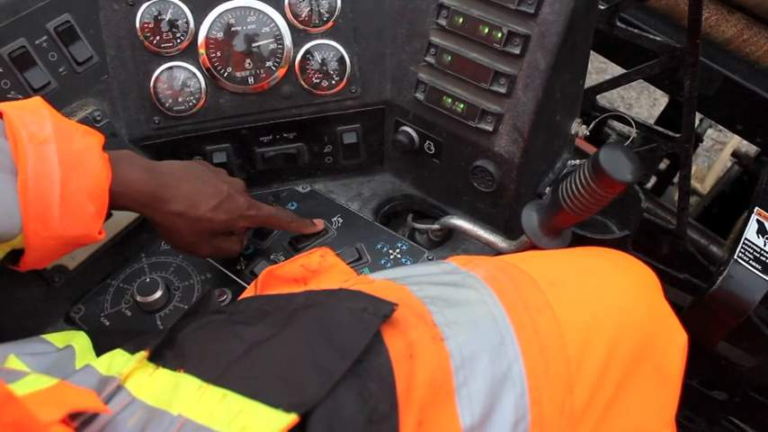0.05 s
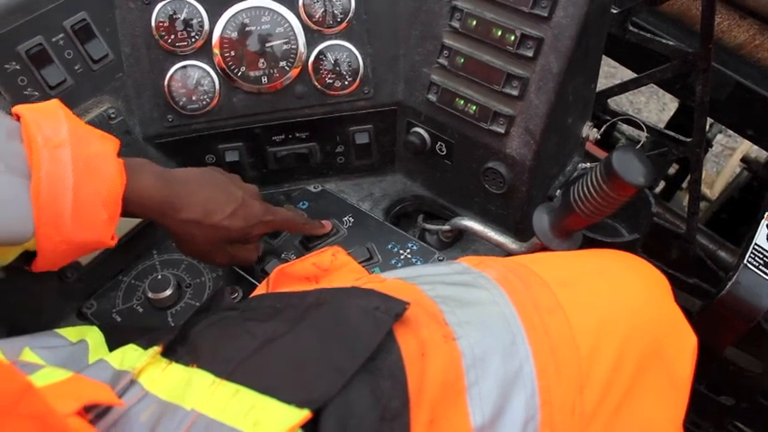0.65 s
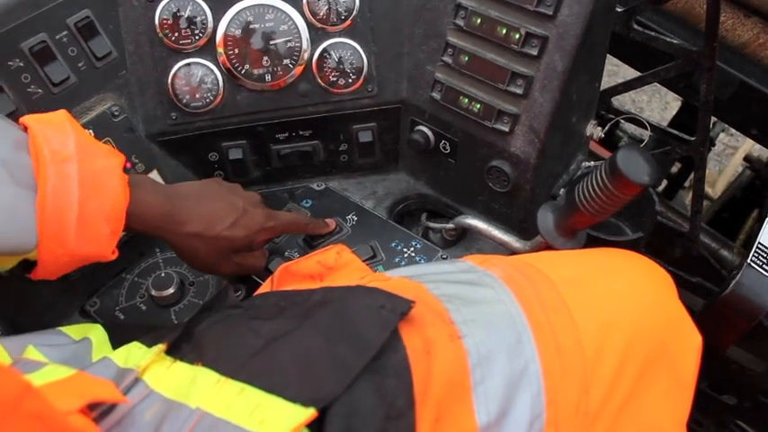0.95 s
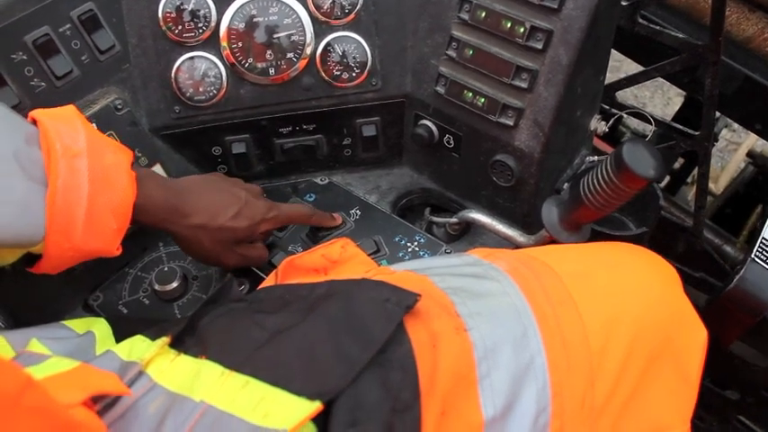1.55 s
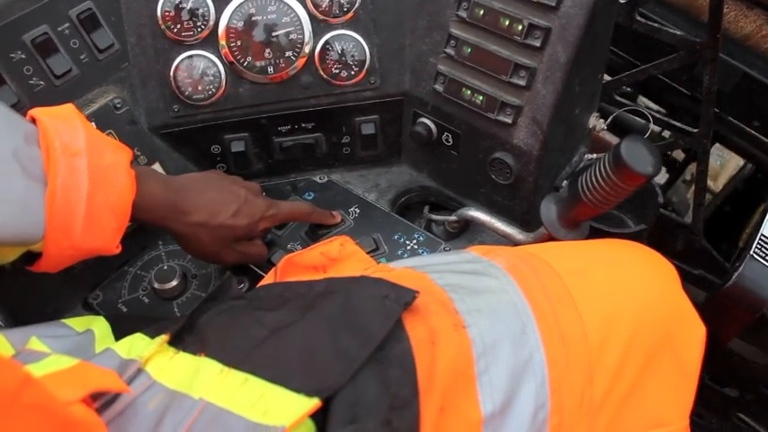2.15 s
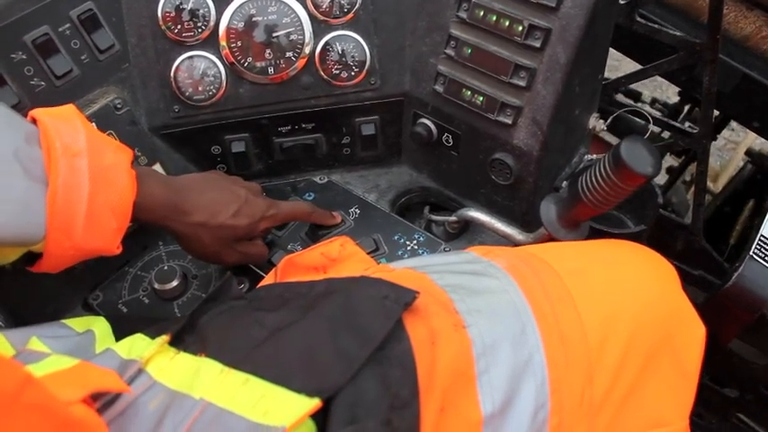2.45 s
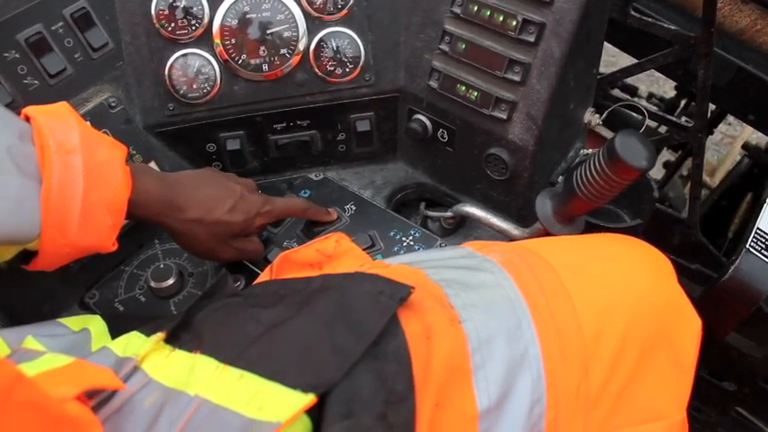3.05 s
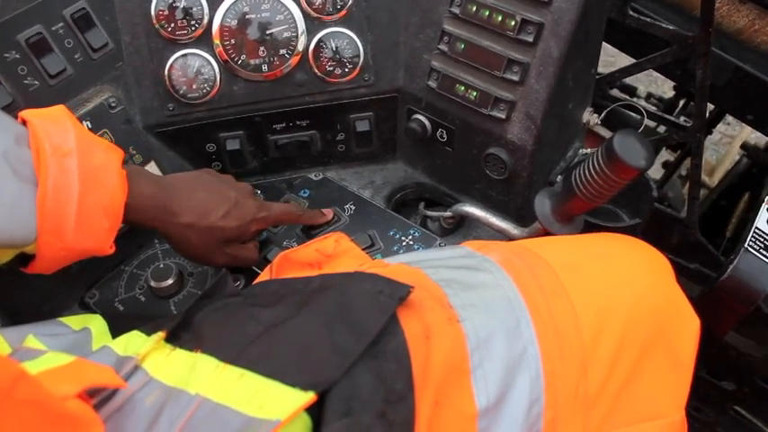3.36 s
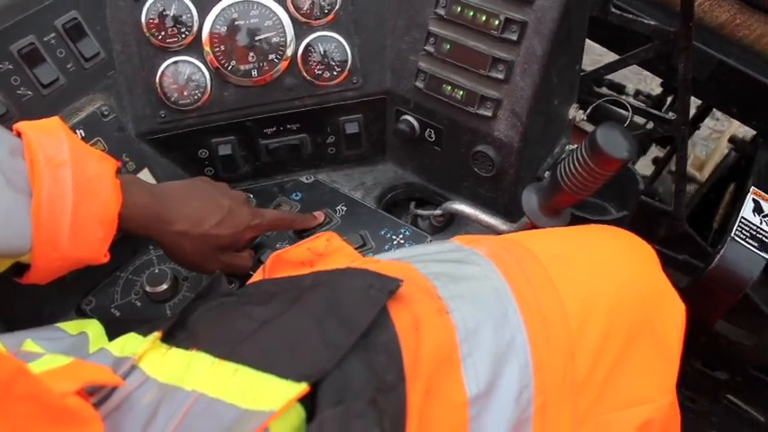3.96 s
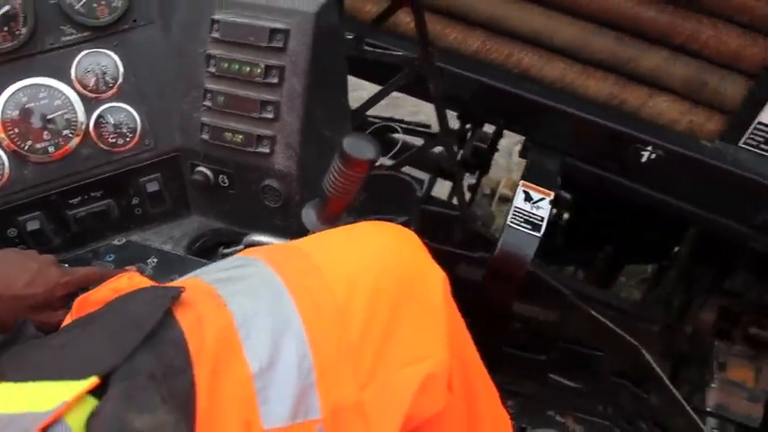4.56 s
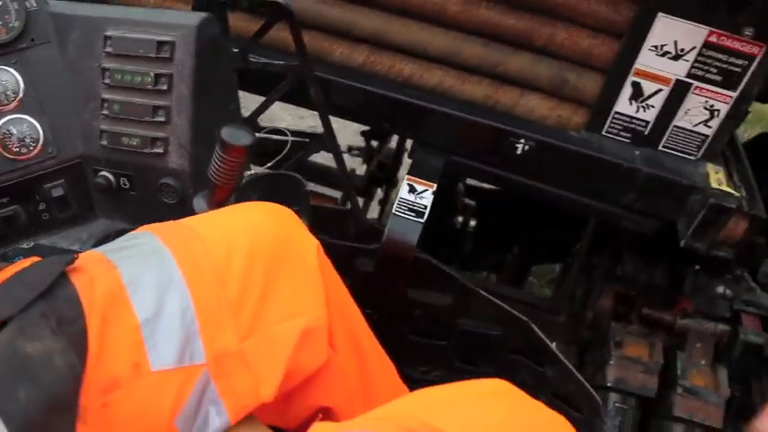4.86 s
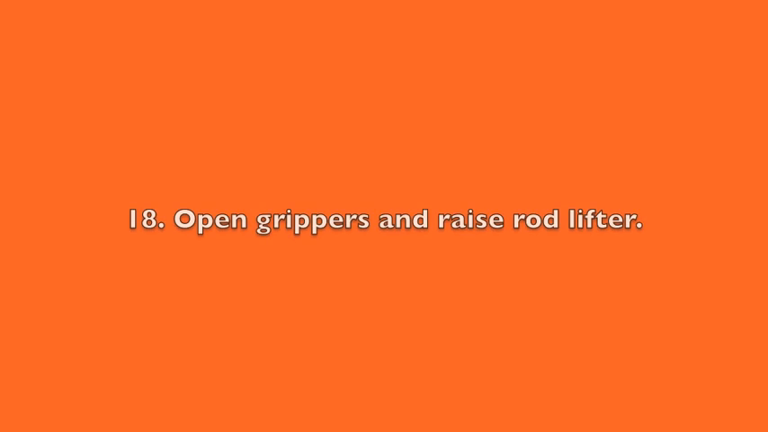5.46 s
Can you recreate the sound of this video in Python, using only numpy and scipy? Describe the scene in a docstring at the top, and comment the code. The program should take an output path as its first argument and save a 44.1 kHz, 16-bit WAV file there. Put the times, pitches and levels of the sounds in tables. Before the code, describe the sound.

A four-cylinder diesel engine runs with a deep, steady boom, heard close at a drilling rig's console. A hydraulic pump hums over a broad roar of air and oil. Steel scrapes faintly at the start. The engine sags slightly under load for about two seconds, with a small clink and a short valve spurt, then recovers. Thin whines swell and the pump hum fades as the microphone turns away, before everything fades quickly.

```python
"""At the console of a drilling rig, a governed four-cylinder diesel booms at its firing rate and drives
a hydraulic pump whose pressure ripple hums. Turbulent air and oil roar and excite covers and pipes.
A held button loads the hydraulics for about two seconds: the engine sags a little and the oil hiss
changes colour. The steel rod handler scrapes and clinks faintly, a valve spurts, and thin whines swell
and fade. The microphone swings from the console to the rod rack, and the sound fades out quickly."""
import sys
import numpy as np
from scipy import signal
from scipy.fft import rfft, irfft, next_fast_len
from scipy.io import wavfile
from scipy.ndimage import map_coordinates

SR = 44100
rng = np.random.default_rng(int(sys.argv[2]) if len(sys.argv) > 2 else 0)


def waveform_to_disk(signal):
    """Save audio, clipped to [-1, 1], as 16-bit WAV at the path in sys.argv[1]."""
    frames = np.transpose(np.atleast_2d(signal))
    scaled = np.clip(frames, -1, 1) * 32767
    samples = np.round(scaled).astype(np.int16)
    wavfile.write(sys.argv[1], SR, samples)


N = 246915
TIME = np.arange(N) / SR
PADDED = next_fast_len(N, real=True)
HZ = np.maximum(np.arange(PADDED // 2 + 1) * SR / PADDED, 1)

CYLINDERS = 4
FREE_SPEED, LOADED_SPEED = 22.96, 22.69  # four-stroke cycles per second, two crank turns each
# the microphone's swing from console to rod rack: t/s, share of the swing (0-1)
MIC_SWING = [(0, 0.09), (4.1, 0), (4.4, 0.32), (4.65, 0.87), (5.1, 1)]


def engine_hum(cycle, shares, scatter_rad=0.714, trim_db=0.06):
    """Periodic firing gives a harmonic series: the fourth order booms, the others line up into thuds."""
    # exhaust boom: level/dB running free, under load, facing the rods
    boom_levels = (-29.6, -30.2, -28.0)
    # higher harmonics: multiple of the cycle rate, level/dB running free, under load, facing the rods
    harmonics = [(6, -51, -48, -56), (7, -42, -39, -48), (8, -33, -34, -36), (9, -50, -50, -55),
                 (10, -41, -44, -47), (11, -47, -49, -52), (12, -44, -44, -39), (13, -48, -44, -48),
                 (14, -45, -49, -46), (15, -49, -47, -48), (16, -37, -42, -41), (18, -41, -47, -45),
                 (20, -34, -35, -36), (21, -48, -47, -51), (22, -46, -40, -48), (23, -43, -42, -45),
                 (24, -45, -47, -45), (28, -43, -43, -41), (32, -52, -47, -71), (37, -55, -49, -59),
                 (41, -49, -56, -55), (49, -55, -49, -54), (52, -46, -51, -49), (68, -52, -50, -55),
                 (88, -49, -54, -56), (104, -50, -51, -55)]
    boom_db = np.array(boom_levels) @ shares + 1.1 * drift(rate_hz=6)
    out = from_db(boom_db) * np.sin(2 * np.pi * CYLINDERS * cycle)
    for order, *levels in harmonics:
        level_db = trim_db + np.array(levels) @ shares + 1.5 * drift(rate_hz=3)
        # odd orders come from unequal cylinders, high ones arrive by many paths: neither line up
        phase_spread = scatter_rad * max(1, order / 20) ** 2 + order % 2
        phase = 2 * np.pi * order * cycle + phase_spread * rng.standard_normal()
        out += from_db(level_db) * np.cos(phase)
    return np.sqrt(2) * out


def pump(cycle, order=26, level_db=-29):
    """Pressure ripple, thirteen pulses a crank turn, radiates a tone; it fades as the microphone turns."""
    gain = from_db(level_db) * np.sqrt(1 - ramp(start_s=4.11, length_s=0.9))
    flutter = 1 + 0.049 * drift(rate_hz=25)
    return gain * flutter * np.sqrt(2) * np.cos(2 * np.pi * order * cycle)


def roar(cycle, shares, low_cut_hz=32, trim_db=0.13, turned_db=-1.3):
    """Source and filter: the rush is heard as a broad roar and as forced resonance of the rig's parts."""
    # spectral envelope of engine, cooling air and oil: f/Hz, level/dB
    envelope = [(25, -69), (80, -58.5), (200, -61), (500, -64), (680, -65.5), (1100, -66), (1800, -76.5),
                (3500, -69), (4700, -76), (5300, -80), (8700, -82), (11500, -82.5), (13200, -89.5),
                (15800, -88.5)]
    # covers, pipes and valves, with the cooling fan's narrow hum near 300 Hz in the first row: f/Hz, width/Hz,
    # level/dB running free, under load, facing the rods
    resonances = [(299.4, 26, -53.5, -51, -59.5), (454.6, 65, -55.5, -55.5, -61),
                  (822, 85, -66, -64, -66.5), (942, 95, -65, -62, -73.5), (1132, 102, -61.5, -59.5, -61.5),
                  (1238, 100, -65.5, -68.5, -59.5), (1400, 56, -64, -60.5, -61),
                  (1598, 130, -66.5, -66.5, -68), (1731, 66, -68.5, -63.5, -69.5),
                  (1966, 250, -70.5, -71, -69.5), (2313, 470, -72.5, -70.5, -74),
                  (2937, 120, -77.5, -73, -70.5), (3647, 150, -69.5, -66, -74.5),
                  (3787, 33, -61, -65, -78.5), (4193, 150, -70.5, -69, -80.5),
                  (4660, 140, -72, -71.5, -81.5), (4920, 80, -72, -69, -68), (5425, 250, -75.5, -76, -84.5),
                  (6194, 280, -74, -74.5, -73.5), (6970, 950, -81, -78.5, -80), (7730, 270, -79, -76, -75),
                  (8550, 449, -81, -80, -74.5), (8910, 53.6, -69.5, -69.5, -75.5),
                  (9600, 308, -91.5, -82, -94.5), (11200, 240, -79, -80, -76.5),
                  (12600, 400, -87, -87, -77.5), (13681, 744, -99.5, -89, -90),
                  (15600, 120, -86, -102, -93.5)]
    broad_power = spectrum(envelope) / (1 + (low_cut_hz / HZ) ** 2) ** 2
    out = panel_echoes(coloured(rush(cycle), broad_power))
    drive = rush(cycle)
    # oil pressure and listening direction shift the weight among the resonances
    for state, share in enumerate(shares):
        power = sum(peak(hz, width, levels[state]) for hz, width, *levels in resonances)
        out += share * coloured(drive, power)
    return from_db(trim_db + turned_db * shares[-1]) * out


def rush(cycle, throb=0.16, lope=0.08, flow_db=-0.5, clatter_low_hz=650):
    """Turbulence of air and oil and the diesel's clatter, amplitude-modulated by the firing."""
    # the lower rush swells at each firing, and once a cycle as the cylinders are unequal
    swell = throb * np.cos(2 * np.pi * CYLINDERS * cycle) + lope * np.cos(2 * np.pi * cycle)
    flow = from_db(flow_db) * rng.standard_normal(N)
    flow += coloured(flow * swell, peak(hz=0, width=5000, db=0))
    # injectors and valves strike in the same pattern in every cycle
    pattern = rng.standard_normal(round(SR / FREE_SPEED))
    strikes = np.interp(cycle % 1, np.linspace(0, 1, len(pattern)), pattern)
    clatter_power = peak(hz=1100, width=3200, db=-6.5) * (HZ > clatter_low_hz)
    clatter = coloured(strikes * (1 + swell), clatter_power)
    return (flow + clatter) * np.sqrt(SR / 2)  # near 0 dB per Hz


def panel_echoes(x, sway_ms=0.011, swing_ms=0.32, strength=0.22, count=4):
    """Interference: echoes off nearby panels comb-filter the treble and shift as the microphone moves."""
    treble = coloured(x, (1 - peak(hz=0, width=4700, db=0)) ** 2)
    swing = in_time(MIC_SWING)
    echoes = 0
    for lag_ms in np.geomspace(2.3, 9.7, count):
        delay_ms = lag_ms + sway_ms * drift(rate_hz=0.4) + swing_ms * rng.standard_normal() * swing
        echoes += map_coordinates(treble, [np.arange(N) - delay_ms * SR / 1000], order=3)
    # the treble keeps its loudness
    return x - treble + (treble + strength * echoes) / np.sqrt(1 + count * strength ** 2)


def rod_handler(attack_s=0.001):
    """Sliding friction drives the steel's resonances; an impact leaves its modes in damped vibration."""
    # scrapes: t/s, half-width/s, level/dB
    scrapes = [(0.255, 0.031, -31.5)]
    # resonances of the steel parts: f/Hz, width/Hz, level/dB
    steel_resonances = [(654, 50, 0), (1647, 120, -1), (2360, 300, -6), (2550, 130, -3), (3180, 260, -3.5),
                        (4650, 300, -13.5)]
    # impacts: t/s, level/dB
    clinks = [(1.775, -19.5)]
    # modes of the struck steel: f/Hz, level/dB, T60/s
    clink_modes = [(1160, -8.5, 0.1), (1866, -2, 0.044), (1924, -9.5, 0.035), (2260, -6, 0.04),
                   (3140, -11, 0.054), (3700, -8, 0.055)]
    out = swells(scrapes) * noise(sum(peak(*mode) for mode in steel_resonances))
    for start_s, blow_db in clinks:
        age = np.maximum(TIME - start_s, 0)
        attack = 1 - np.exp(-age / attack_s)
        for hz, db, t60 in clink_modes:
            decay = np.exp(-np.log(1000) * age / t60)
            out += from_db(blow_db + db) * attack * decay * np.sin(2 * np.pi * hz * age)
    return out


def valve_spurt():
    """Flow noise: oil hisses briefly through a valve as the hydraulic cylinder takes up its load."""
    # spurts of oil: t/s, half-width/s, level/dB
    spurts = [(1.848, 0.0085, -31.5)]
    # spectrum of their hiss: f/Hz, level/dB
    hiss_colour = [(1000, -27), (3000, 4), (5500, -0.5), (9000, -12), (15000, -25)]
    return swells(spurts) * noise(spectrum(hiss_colour))


def thin_whines(width_hz=45):
    """Narrow-band noise is heard as thin, rough whistles from the rig."""
    # whines that swell and fade, one under load, the rest in the swing: t/s, half-width/s, f/Hz, level/dB
    whines = [(3.27, 0.25, 13500, -57), (4.42, 0.1, 4930, -47.5), (4.57, 0.13, 2027, -43),
              (4.95, 0.15, 4935, -50)]
    return sum(swells([(t, half_width, db)]) * noise(peak(hz, width_hz, 0))
               for t, half_width, hz, db in whines)


def from_db(db):
    """Amplitude ratio of a level in decibels."""
    return 10 ** (np.asarray(db) / 20)


def rms_one(x):
    """Normalisation to an rms of 1."""
    return x / np.sqrt(np.mean(x ** 2) + 1e-20)


def ramp(start_s, length_s):
    """A linear rise from 0 to 1."""
    return np.clip((TIME - start_s) / length_s, 0, 1)


def in_time(rows):
    """Linear interpolation of (t/s, value) rows at every sample."""
    return np.interp(TIME, *np.transpose(rows))


def swells(rows):
    """Gaussian envelopes from (t/s, half-width/s, level/dB) rows."""
    return sum(from_db(db) * np.exp(-((TIME - t) / half_width) ** 2) for t, half_width, db in rows)


def spectrum(points):
    """Power spectrum through (f/Hz, level/dB) points on a logarithmic frequency axis."""
    hz, db = np.transpose(points)
    return from_db(np.interp(np.log(HZ), np.log(hz), db)) ** 2


def peak(hz, width, db):
    """Power response of a steep-sided resonance: a squared Lorentzian."""
    return from_db(db) ** 2 / (1 + (2 * (HZ - hz) / width) ** 2) ** 2


def coloured(x, power):
    """Zero-phase filtering of a steady sound by a power response."""
    return irfft(rfft(x, PADDED) * np.sqrt(power), PADDED)[:N]


def noise(power):
    """White noise filtered to a given power spectrum, rms 1."""
    return rms_one(coloured(rng.standard_normal(N), power))


def drift(rate_hz, size=4096):
    """Slow random fluctuation: low-passed noise of rms 1."""
    hz = np.arange(size // 2 + 1) * SR / N
    slow = irfft(rfft(rng.standard_normal(size)) / (1 + (hz / rate_hz) ** 2))
    return np.interp(TIME, np.linspace(0, N / SR, size), rms_one(slow))


def scene(build_s=0.12, bleed_s=0.13, hunt_hz=0.02835):
    """Superposition of the rig's sources, alike in both ears; engine, pump and roar share one crank."""
    # the button that builds up oil pressure: t/s pressed, t/s released
    presses = [(1.68, 3.53)]
    load = np.clip(sum(ramp(on, build_s) - ramp(off, bleed_s) for on, off in presses), 0, 1)
    # the governor lets the speed droop in step with the load, and hunts a little
    speed = FREE_SPEED + (LOADED_SPEED - FREE_SPEED) * load + hunt_hz * drift(rate_hz=3)
    cycle = np.cumsum(speed) / SR
    swing = in_time(MIC_SWING)
    # weights of the three states: running free, under load, facing the rods
    shares = np.array([(1 - load) * (1 - swing), load * (1 - swing), swing])
    rig = engine_hum(cycle, shares) + pump(cycle) + roar(cycle, shares)
    rig += thin_whines() + rod_handler() + valve_spurt()
    return np.array([rig, rig])


def record(dry, gain_db=0.5, cutoff_hz=15800):
    """A quick linear fade at both ends; a steep low-pass filter limits the bandwidth."""
    fade = ramp(start_s=0.037, length_s=0.097) * (1 - ramp(start_s=5.04, length_s=0.1))
    low_pass = signal.ellip(12, 0.1, 80, cutoff_hz, fs=SR, output="sos")
    return signal.sosfilt(low_pass, dry * fade * from_db(gain_db))


dry = scene()
out = record(dry)
waveform_to_disk(out)
```